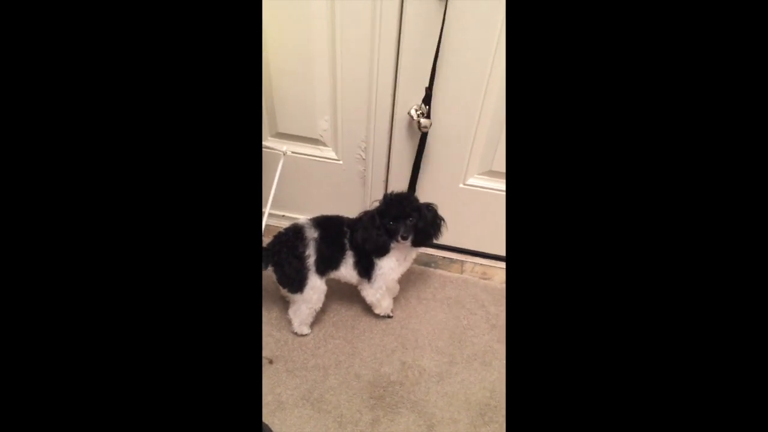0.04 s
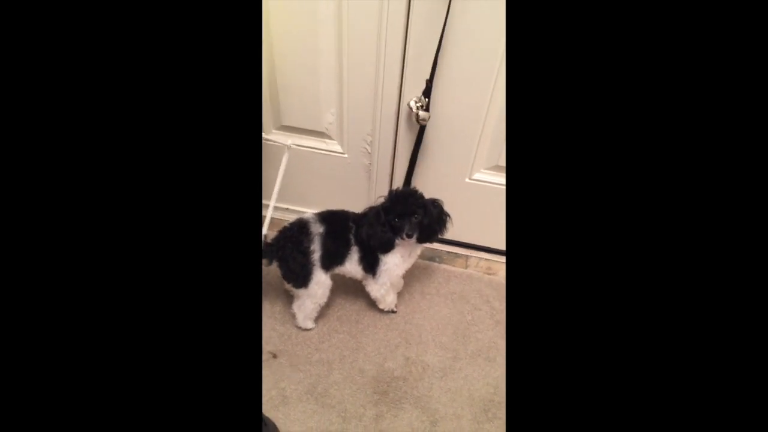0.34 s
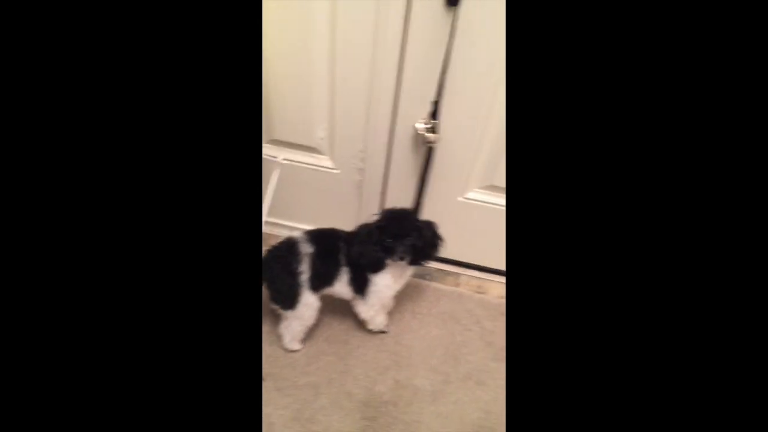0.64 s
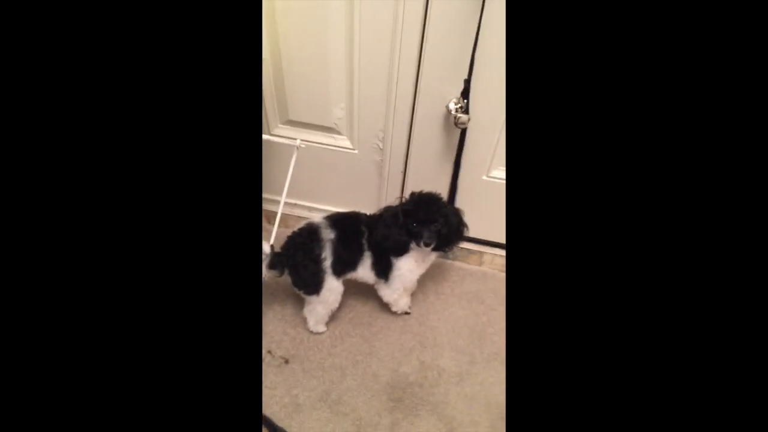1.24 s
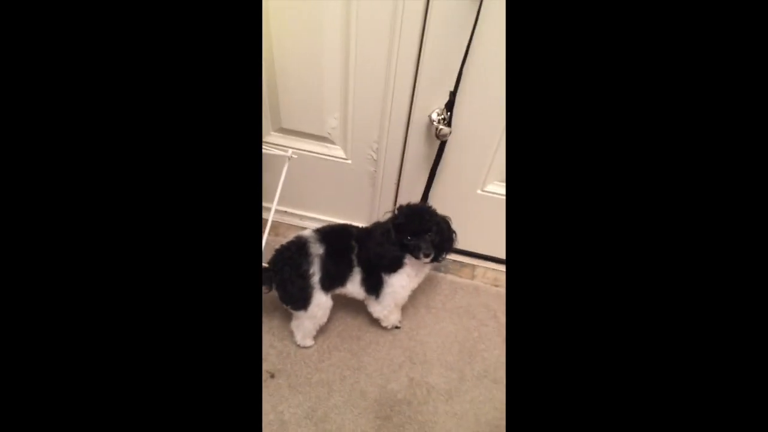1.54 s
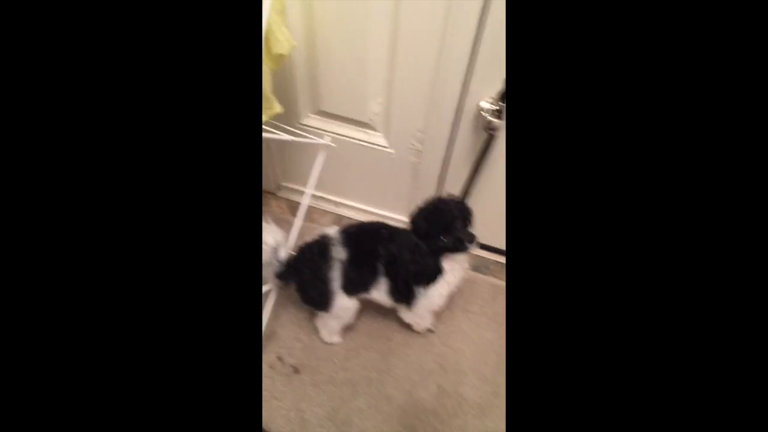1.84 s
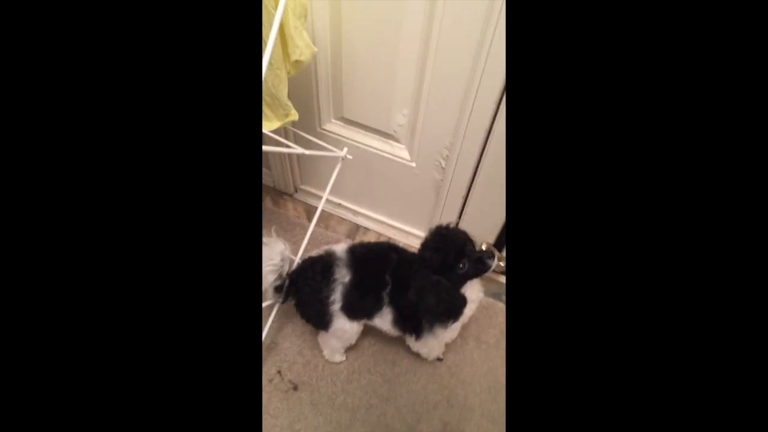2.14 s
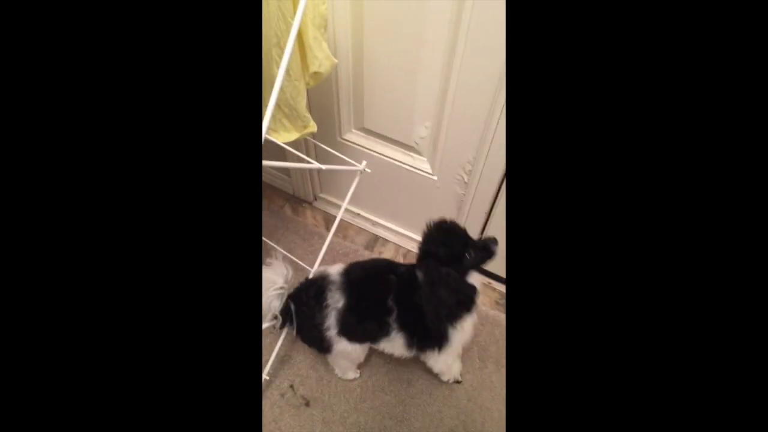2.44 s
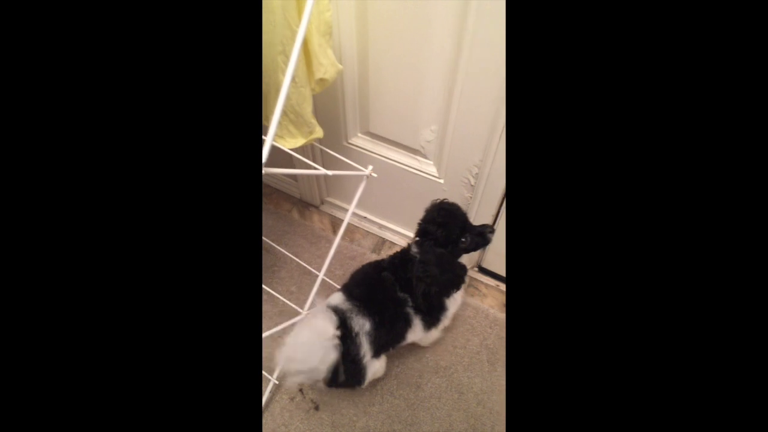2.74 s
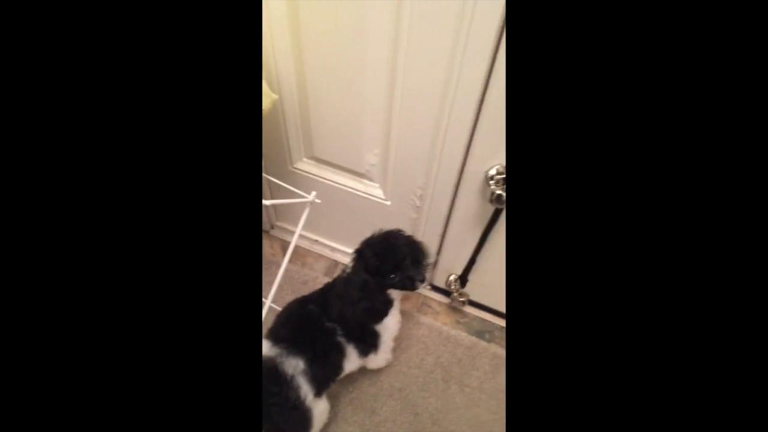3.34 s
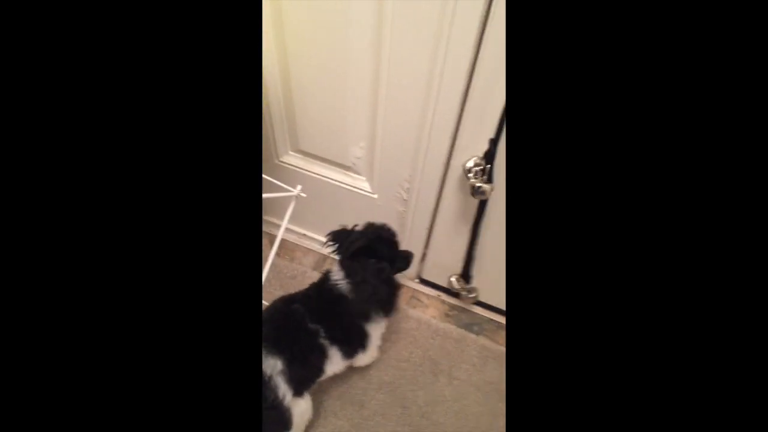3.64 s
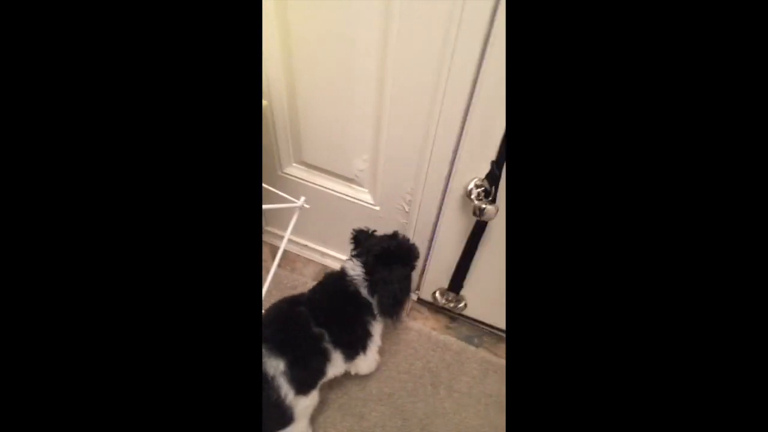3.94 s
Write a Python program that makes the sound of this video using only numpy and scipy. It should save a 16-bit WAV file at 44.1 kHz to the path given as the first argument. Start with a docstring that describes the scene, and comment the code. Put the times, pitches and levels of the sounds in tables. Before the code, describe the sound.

Small bells on a hanging strap tinkle faintly while a dog steps softly on carpet in a quiet room. The strap scrapes and clacks against a door, then the bells jingle louder with a sharp knock and low thumps.

```python
"""Sleigh bells tinkle on a strap as a small dog noses it, on a door in a carpeted room.
Loose pellets strike the metal shells and make them ring. The strap scrapes and slides, then
swings back: the bells jingle, clack on the panel and make the door boom.
Soft footfalls, small ticks of claws and rustling fur lie over a quiet room."""
import sys
import numpy as np
from scipy import signal
from scipy.fft import rfft, irfft
from scipy.io import wavfile

SR = 44100
rng = np.random.default_rng(int(sys.argv[2]) if len(sys.argv) > 2 else 0)


def persist_wave(psi):
    """Save psi, clipped to +-1, as 16-bit WAV."""
    counts = np.round(np.clip(psi, -1, 1) * 32767).astype(np.int16)
    wavfile.write(sys.argv[1], SR, np.atleast_2d(counts).T)


N = 176400

# pellets hitting the bells: start_s, level_db, treble_db_per_octave, bell_name
PELLET_HITS = [(.118, -62.5, -1.5, "A"), (.149, -74, 1, "A"), (0.202, -54, -7, "A"), (0.209, -58.5, 0, "A"),
               (.227, -58, -10, "A"), (0.287, -70, 2, "A"), (.309, -66, -2, "A"), (1.96, -69.5, 8, "B"),
               (1.97, -61, 3.5, "B"), (2.147, -48.5, -12, "B"), (3.451, -40.5, 0.5, "B"),
               (3.484, -48, 8, "B"), (3.488, -54.5, 1, "B"), (3.55, -49, 2, "B"), (3.577, -45.5, -0.5, "B"),
               (3.696, -44, -1, "B"), (3.701, -44, 5, "B"), (3.733, -40.5, -6, "B"),
               (3.827, -46, -5.5, "B"), (3.854, -60, -5, "B"), (3.917, -47.5, 2, "C"),
               (3.921, -40.5, 2.5, "C"), (3.944, -39, -13, "C"), (3.958, -58, -5, "C"),
               (3.978, -53.5, 4.5, "B")]
# the tones of each named bell: pitch_hz, level_db
BELL_TONES = {"A": [(3050, -10), (3210, -8.5), (3920, -7), (6270, -3), (6660, -4), (9400, -2),
              (9880, -10.5), (10100, 2), (11200, -2), (12500, -6), (13000, 2.5), (13400, -3)],
              "B": [(3914, -0.5), (6595, -7.5), (6860, -8), (8958, -6), (9943, -16.5), (10070, -3),
              (11110, 2), (11560, -1), (12500, -6), (13230, -13.5)], "C": [(3300, -9.5), (3440, -13),
              (3935, -4), (5895, -6), (6350, -10), (7768, -19), (9625, -21), (10060, 3), (12210, -12),
              (12670, -15), (13230, -9), (15640, -12)]}
# the hiss of shells rubbing: pitch_hz, level_db
SHELL_HISS = [(1000, -21), (3000, 11.5), (5000, -11), (6600, 13), (7800, 4), (12000, 12), (14200, -13),
              (15500, -19)]
def sleigh_bells():
    """A pellet hits and rattles, ringing its bell and, more softly, the others; the shells rub too."""
    rubbing, out = np.zeros((2, N))
    start_s, db, treble, struck = map(np.array, zip(*PELLET_HITS))
    starts = (start_s * SR).astype(int)
    for when, strength in zip(start_s, from_db(db + treble - 10.5)):
        add(rubbing, when, strength * fade(.072, SR // 2))
    for name, tones in BELL_TONES.items():
        strengths = from_db(db - 8.5 * (struck != name))
        contacts = bounces(start_s, strengths * from_db(-11), per_s=1000, fade_s=.13)
        contacts[starts] = strengths
        out += metal_click(contacts, gain_db=8)
        hits = np.flatnonzero(contacts)
        hardness = treble[np.searchsorted(starts, hits, "right") - 1]  # set by the latest strike
        # the slit in the shell gives each tone a slightly lower twin, so the pair wavers
        twins = [(hz * .986, tone_db - 3) for hz, tone_db in tones]
        for hz, tone_db in tones + twins:
            drive = contacts.copy()
            drive[hits] *= random_signs(from_db(hardness * np.log2(hz / 4000)))
            fade_s = .14 * (4000 / hz) ** .6  # high tones die sooner
            out += from_db(tone_db - 14) * ring(drive, hz, fade_s)
    return out + rubbing * coloured(noise(), SHELL_HISS)


# shells and rings touching: start_s, level_db
METAL_TOUCHES = [(.451, -68), (1.517, -62.5), (1.797, -54.5), (1.801, -50.5), (2.135, -52.5), (2.366, -58),
                 (2.533, -69), (2.645, -50), (2.658, -48), (3.614, -48.5), (3.62, -46), (3.766, -44),
                 (3.787, -67), (3.916, -53)]
# their tones, cut short by the strap: pitch_hz, level_db
CLINK_TONES = [(6850, -5.5), (8000, -8), (8550, -2), (9600, -6.5), (11200, -8.5), (12700, -9), (14500, -5),
               (15500, -13)]
def clinks():
    """Metal chatters on metal; fainter touches come at random as the strap rustles."""
    start_s, db = np.transpose(METAL_TOUCHES)
    touches = bounces(start_s, from_db(db - 4), per_s=1400, fade_s=.046)
    touches[(start_s * SR).astype(int)] = from_db(db)
    touches += random_moments(per_s=31) * from_db(-.5) * level(RUSTLE_LEVELS) * noise()
    out = metal_click(touches, gain_db=6.5)
    for hz, tone_db in CLINK_TONES:
        out += from_db(tone_db - 6) * ring(random_signs(touches), hz, fade_s=.018)
    return out


# bells and fittings knocking on the door: start_s, level_db, brightness_hz, fade_s
KNOCKS = [(2.532, -54.5, 5000, 0.051), (2.644, -55, 4960, 0.072), (2.660, -44.5, 4070, 0.07),
          (2.719, -50, 2700, 0.096), (2.753, -45.5, 4000, 0.025), (2.8223, -33.5, 12000, 0.06),
          (2.833, -37.5, 3840, 0.082), (3.499, -50, 2780, 0.095), (3.588, -49.5, 1570, 0.099),
          (3.615, -39.5, 1330, 0.1), (3.692, -44, 1300, 0.074), (3.7166, -20.5, 9000, 0.0056),
          (3.721, -31.5, 4360, 0.055), (3.998, -34.5, 7000, 0.13)]
# the clatter of a knock: pitch_hz, level_db
CLATTER_COLOUR = [(200, -1), (450, -14), (680, -3), (950, -5), (1250, 1.5), (2200, 1.5), (3500, -1.5),
                  (5000, -2.5), (7500, -4), (9000, -7.5), (12000, -8), (16000, 7)]
# tones left ringing in the panel and fittings: pitch_hz, level_db
KNOCK_TONES = [(598, -3), (754, -4), (1100, -2), (1409, -3), (1669, -4), (1847, 0), (2027, 0), (2582, -1),
               (3020, -3), (3783, 0), (9004, -7)]
def clacks():
    """Each knock makes a short clatter and leaves a few tones ringing; softer contacts are duller."""
    out, clicks = np.zeros((2, N))
    for start_s, db, brightness_hz, fade_s in KNOCKS:
        clatter = coloured(noise(SR // 2), CLATTER_COLOUR)
        clatter = rms_one(butter(clatter, brightness_hz, "low"))
        add(out, start_s, from_db(db) * clatter * fade(fade_s, SR // 2))
        click = from_db(db) * signal.unit_impulse(SR // 10)
        add(clicks, start_s, butter(click, brightness_hz, "low"))
    for k, (hz, db) in enumerate(KNOCK_TONES):
        out += (-1) ** k * from_db(db - 16.5) * ring(clicks, hz, fade_s=.061)
    return out


# metal cracking against the door: start_s, level_db
HARD_HITS = [(2.82, -43), (3.7171, -14.5)]
# the tones of a crack: pitch_hz, level_db, fade_s
CRACK_TONES = [(2890, -10, 0.014), (3754, -6, 0.012), (9000, -14, 0.013), (12000, -26, 0.0035)]
def cracks():
    """The hardest knocks start with a sharp click whose tones die almost at once."""
    clicks = np.zeros(N)
    for start_s, db in HARD_HITS:
        add(clicks, start_s, from_db([db]))
    return sum(from_db(db) * ring(clicks, hz, fade_s) for hz, db, fade_s in CRACK_TONES)


# blows on the door panel: start_s, level_db, contact_s
DOOR_BLOWS = [(3.522, -31, 0.023), (3.601, -31.5, 0.0048), (3.614, -25, 0.0021), (3.622, -25, 0.005),
              (3.693, -27, 0.003), (3.7214, -21, 0.0052), (3.823, -39, 0.0046)]
# the door's own tones: pitch_hz, level_db, fade_s
DOOR_TONES = [(65, 1.5, 0.22), (76.5, -7.5, 0.39), (127, -4.5, 0.23), (172, -5, 0.07), (200.7, -6.5, 0.2),
              (258.4, -9, 0.2), (298.7, -8.5, 0.22), (363, -12.5, 0.19), (470, -13, 0.044),
              (579, -20, 0.23)]
def door_boom():
    """Rounded pushes set the panel booming; short ones also wake its higher tones."""
    push, t = np.zeros(N), np.arange(SR // 10) / SR
    for start_s, db, contact_s in DOOR_BLOWS:
        pulse = t * np.exp(-2 * np.pi * t / contact_s)
        add(push, start_s, from_db(db) * pulse / pulse.sum())
    return sum((-1) ** k * from_db(db) * ring(push, hz, fade_s)
               for k, (hz, db, fade_s) in enumerate(DOOR_TONES))


# how loud the scrape is: time_s, level_db
SCRAPE_LEVELS = [(2.62, -71), (2.66, -60), (2.70, -65.5), (2.76, -50.5), (2.81, -52), (2.86, -63),
                 (2.92, -97), (3.0, -85)]
# its mix of low and high: pitch_hz, level_db
SCRAPE_COLOUR = [(180, -37), (300, 0), (555, -4), (749, 4), (930, -15), (1100, 9), (1350, -8.5),
                 (2280, 3.5), (4440, -14.5), (8360, -21), (16000, -26)]
def strap_scrape():
    """The strap catches and slips on the door."""
    return friction(SCRAPE_LEVELS, SCRAPE_COLOUR)


# how loud the slide is: time_s, level_db
SLIDE_LEVELS = [(.4, -79), (.7, -74.5), (1.25, -75.5), (1.45, -78), (2.80, -76.5), (2.84, -56),
                (2.93, -62.5), (3.07, -61), (3.14, -70), (3.21, -80)]
# its mix of low and high: pitch_hz, level_db
SLIDE_COLOUR = [(290, -41), (520, -23), (933, -17), (2190, -7), (3110, -12), (5500, -6), (9360, -8),
                (16000, -14)]
def strap_slide():
    """The sliding strap makes a smooth hiss."""
    return level(SLIDE_LEVELS) * coloured(noise(), SLIDE_COLOUR)


# light taps of claws and strap: start_s, level_db, pitch_hz, fade_s
TAPS = [(.207, -65, 850, 0.084), (.67, -64.5, 870, .06), (.331, -62, 3040, 0.032), (.465, -59, 510, 0.046),
        (1.045, -55.5, 1090, 0.017), (1.158, -47, 640, 0.032), (1.159, -56, 1410, 0.031),
        (1.197, -52, 1010, 0.024), (1.258, -52, 580, 0.046), (1.517, -56, 3070, 0.023),
        (1.736, -57, 2400, 0.064), (1.797, -56.5, 2130, 0.06), (2.37, -50.5, 685, 0.056),
        (2.397, -56, 2420, 0.044), (2.53, -49.5, 2170, 0.043), (3.319, -57.5, 1560, 0.032),
        (3.523, -53, 1060, .05), (3.597, -40, 454, 0.075), (3.722, -33.5, 650, 0.052),
        (3.915, -35, 5100, 0.017), (3.956, -55, 2260, 0.08)]
def ticks():
    """Each tap is a tiny burst of noise around its own pitch."""
    out, t = np.zeros(N), np.arange(SR // 4) / SR
    rise = np.minimum(t / .0027, 1)
    for start_s, db, hz, fade_s in TAPS:
        tap = rms_one(butter(noise(len(t)), [hz / 2 ** .45, hz * 2 ** .45], "band"))
        add(out, start_s, from_db(db) * tap * rise * fade(fade_s, len(t)))
    return out


# steps on the carpet: start_s, level_db, pitch_hz
FOOTFALLS = [(0.602, -55.5, 82.5), (0.918, -46, 84.5), (0.941, -56.5, 190), (1.714, -46, 98.4),
             (1.992, -56, 298), (2.373, -38, 107), (2.374, -56, 237), (2.597, -50, 100), (2.829, -46.5, 65),
             (2.875, -51, 130), (3.157, -45.5, 100), (3.312, -48, 140), (3.329, -42.5, 76.4)]
def footfalls():
    """Each step briefly shakes the floor and makes a dull puff in the carpet."""
    out, t = np.zeros(N), np.arange(SR // 2) / SR
    rise = np.minimum(t / .0026, 1)
    for start_s, db, hz in FOOTFALLS:
        puff = rms_one(butter(noise(len(t)), [hz / 2, hz * 3], "band"))
        thud = np.sin(2 * np.pi * hz * t) + from_db(-15) * puff
        add(out, start_s, from_db(db) * thud * rise * fade(.14, len(t)))
    return out


# how loud the rustle is: time_s, level_db
RUSTLE_LEVELS = [(0, -91), (.5, -79.5), (.7, -75), (1.0, -73.5), (1.2, -70.5), (1.38, -76), (1.6, -76.5),
                 (1.76, -64.5), (2.0, -67), (2.2, -68), (2.45, -74.5), (3.3, -73.5), (3.52, -73),
                 (4, -67.5)]
# its mix of low and high: pitch_hz, level_db
RUSTLE_COLOUR = [(120, -43), (200, 7.5), (289, 0.5), (558, -2.5), (1230, 0), (3370, -10.5), (3900, -9.5),
                 (4770, -17), (11500, -18), (16000, -19.5)]
def fur_rustle():
    """Fur and strap rub softly."""
    return friction(RUSTLE_LEVELS, RUSTLE_COLOUR)


# how loud the rumble is: time_s, level_db
RUMBLE_LEVELS = [(0, -78.5), (.5, -77), (.8, -71), (1.55, -72), (2.0, -70.5), (2.5, -69), (2.9, -63),
                 (3.25, -69), (3.5, -58.5), (3.75, -39.5), (4, -60)]
# its mix of low and high: pitch_hz, level_db
RUMBLE_COLOUR = [(25, -10), (45, -4.5), (68, 7), (98, -4.5), (122, -1), (200, -14.5), (300, -13.5),
                 (600, -27), (1500, -43.5)]
def handling_rumble():
    """Handling makes a deep noise that swells and sinks."""
    return level(RUMBLE_LEVELS) * coloured(noise(), RUMBLE_COLOUR)


# the room's air: pitch_hz, level_db
AIR_COLOUR = [(40, -1), (100, 0), (400, -5.5), (1000, -11.5), (3000, -10.5), (4800, -15.5),
              (7000, -18.5), (16000, -27.5)]
def room_air():
    """The quiet room has a faint, steady hush."""
    return from_db(-72.5) * coloured(noise(), AIR_COLOUR)


def room_echo(x):
    """The room answers with a short, slightly dull echo."""
    tail = butter(noise(SR), 7000, "low", order=1) * fade(.27, SR)
    tail *= np.arange(SR) > .0011 * SR  # the echo arrives a moment late
    return from_db(-13.5) * signal.fftconvolve(x, tail / np.sqrt(np.sum(tail ** 2)))[:N]


def friction(curve, colour, pitches=24):
    """Rubbing is many tiny, uneven slips, plus rarer pitched scratches where fibres catch."""
    sizes = noise() * from_db(1.2 * np.minimum(rng.exponential(1, N), 4))
    slips = random_moments(per_s=2500) * sizes
    catches = random_moments(per_s=260) * sizes
    pitch_choice = rng.integers(0, pitches, N)
    scratches = sum(hz * ring(catches * (pitch_choice == k), hz, fade_s=47 / hz)
                    for k, hz in enumerate(np.geomspace(400, 9000, pitches)))
    return level(curve) * (coloured(slips, colour) + from_db(-7) * coloured(scratches, colour))


def bounces(times, strengths, per_s, fade_s):
    """Random, ever weaker contacts follow each blow."""
    vigour = np.zeros(N)
    for start_s, strength in zip(times, strengths):
        add(vigour, start_s, strength * fade(fade_s, SR // 2))
    return vigour * random_moments(per_s)


def metal_click(contacts, gain_db):
    """The bare, bright click of metal on metal."""
    return from_db(gain_db) * butter(random_signs(contacts), 5000, "high")


def ring(drive, hz, fade_s):
    """Each click in the drive starts one fading tone."""
    decay = np.exp(-np.log(1000) / (fade_s * SR))
    angle = 2 * np.pi * hz / SR
    return signal.lfilter([0, np.sin(angle)], [1, -2 * decay * np.cos(angle), decay ** 2], drive + 1e-18)


def fade(fade_s, size):
    """Die away by 60 dB in fade_s seconds."""
    return np.exp(-np.log(1000) * np.arange(size) / SR / fade_s)


def level(rows):
    """Gain along a (time_s, level_db) curve, silent outside it."""
    time_s, db = np.transpose(rows)
    return from_db(np.interp(np.arange(N) / SR, time_s, db, left=-200, right=-200))


def coloured(x, colour):
    """Give a noise its mix of low and high, at an average level of 1."""
    hz, db = np.transpose(colour)
    f = np.maximum(np.fft.rfftfreq(len(x), 1 / SR), 1)
    gain = from_db(np.interp(np.log(f), np.log(hz), db)) * np.minimum(f / hz[0], 1) ** 2
    return rms_one(irfft(rfft(x) * gain, len(x)))


def butter(x, hz, kind, order=2):
    """Keep the lows, the highs or a band."""
    return signal.sosfilt(signal.butter(order, hz, kind, fs=SR, output="sos"), x)


def add(out, start_s, sound):
    """Mix a sound in at a time."""
    i = min(int(start_s * SR), N - 1)
    out[i:i + len(sound)] += sound[:N - i]


def from_db(db):
    """Decibels to gain."""
    return 10 ** (np.asarray(db) / 20)


def rms_one(x):
    """Scale to an average (rms) level of 1."""
    return x / np.sqrt(np.mean(x ** 2) + 1e-20)


def noise(size=N):
    """White noise."""
    return rng.standard_normal(size)


def random_moments(per_s):
    """Pick about per_s moments each second."""
    return rng.random(N) < per_s / SR


def random_signs(x):
    """Make each contact a push or a pull by chance."""
    return x * rng.choice([-1, 1], len(x))


def scene():
    """Bells, knocks and rubbing echo in the room, over the thuds and the quiet air."""
    near = sleigh_bells() + clinks() + clacks() + cracks() + ticks() + fur_rustle() + strap_scrape()
    background = strap_slide() + handling_rumble() + room_air()
    return (near + room_echo(near) + door_boom() + footfalls() + background)[None]


def record(dry):
    """The microphone loses the deepest bass; the highest treble is cut steeply."""
    treble_cut = signal.ellip(10, .2, 70, 15800, fs=SR, output="sos")
    return signal.sosfilt(treble_cut, butter(dry, 39, "high"))


dry = scene()
out = record(dry)
persist_wave(out)
```